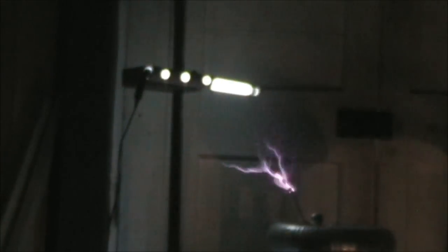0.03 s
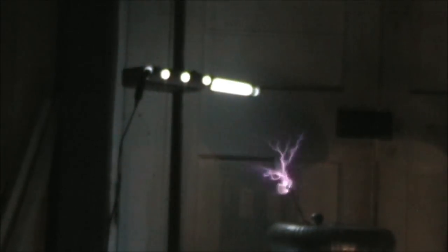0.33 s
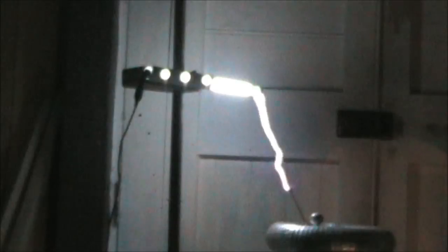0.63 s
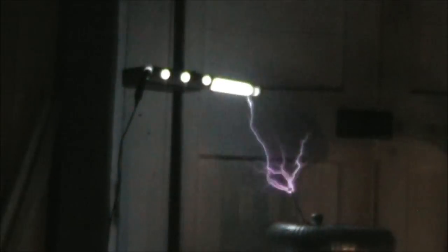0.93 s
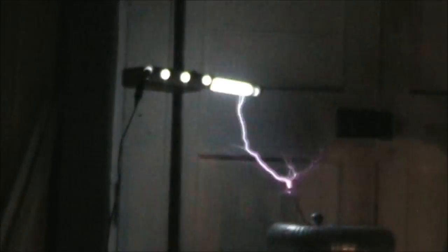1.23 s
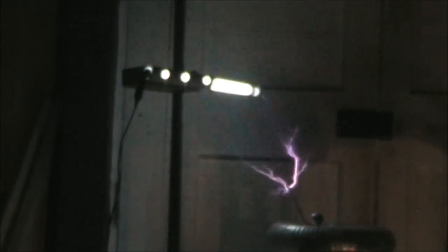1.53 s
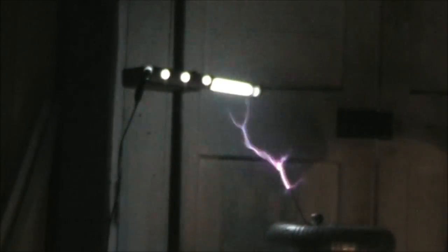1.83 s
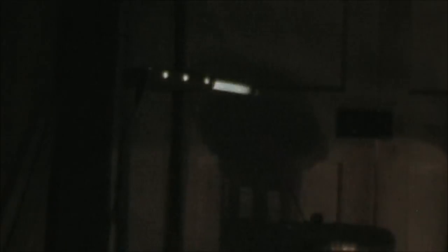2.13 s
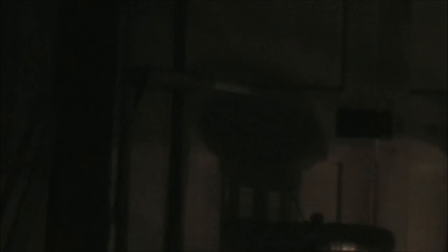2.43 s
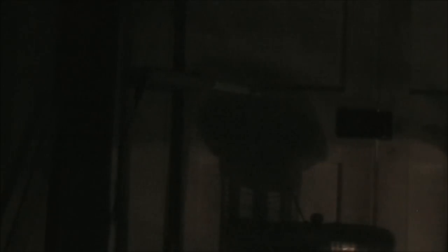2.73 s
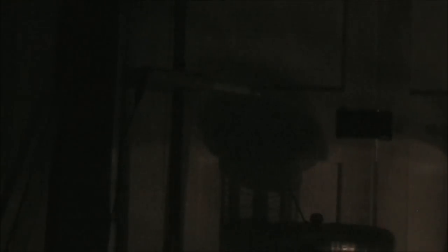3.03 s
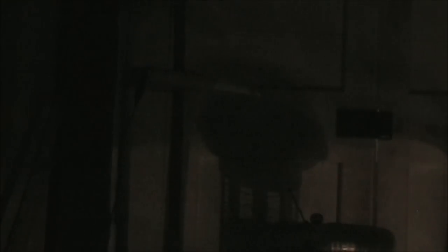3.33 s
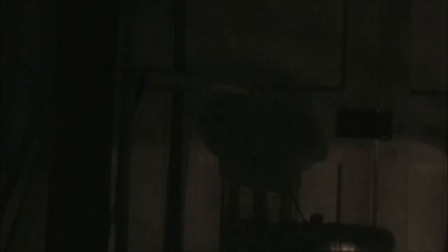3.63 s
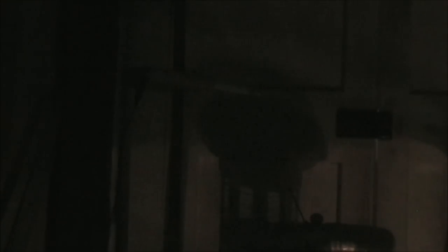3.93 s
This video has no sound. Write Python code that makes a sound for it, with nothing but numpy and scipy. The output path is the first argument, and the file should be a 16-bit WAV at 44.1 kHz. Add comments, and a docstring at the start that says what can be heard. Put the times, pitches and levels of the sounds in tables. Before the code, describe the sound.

A high-voltage coil throws loud, buzzing, crackling sparks in a small hard-walled room. Halfway through they cut off, leaving a much quieter motor whirring with a rapid metallic scrape. The stereo microphones are far enough away to catch the walls.

```python
"""A spark coil in a small hard room, on a stereo pair far enough off to hear plenty of the walls.
First its rotary gap throws buzzing arcs, which push the recorder's gain control down.
At about 2 s the power is cut; the arcs die with the room and the gain slowly comes back up.
The gap's motor whirs on, its rotor scraping once a turn, then from 3.2 s only now and then."""
import sys
import numpy as np
from scipy import signal
from scipy.fft import rfft, irfft, next_fast_len
from scipy.io import wavfile
from scipy.ndimage import uniform_filter1d

SR = 44100
rng = np.random.default_rng(int(sys.argv[2]) if len(sys.argv) > 2 else 0)


def master(y):
    """Save y as 16-bit WAV."""
    cut = np.clip(np.atleast_2d(y).T, -1, 1)
    pcm = np.round(cut * 32767)  # scale
    wavfile.write(sys.argv[1], SR, pcm.astype(np.int16))


N = 176400
TIME = np.arange(N) / SR

# stereo width of the room's reverberation (frequency [Hz], side gain [dB])
ROOM_WIDTH = [(200, 2), (600, -16), (1200, -11), (2300, -16.5), (4500, -9), (8000, -4), (13000, -5)]
ROOM_T60_S, ROOM_BUILD_S = 0.28, 0.0048

# spectrum of the air stirred by the rotor (frequency [Hz], relative level [dB])
WHIR_SPECTRUM = [(25, -8), (60, -17.5), (140, -19), (260, -10), (400, -14.5), (750, -18), (1000, -8.5),
                 (1900, -7.5), (2900, -14.5), (4200, -21), (9500, -19), (12000, -31), (14000, -51)]
# loudness of that whir (time [s], level [dB])
WHIR_ENVELOPE = [(2.5, -42), (3.35, -40.5), (3.55, -39.5), (3.76, -38), (3.92, -39.5), (4, -39)]
# its stereo width (frequency [Hz], side gain [dB])
WHIR_SIDE = [(150, 2), (400, -1.5), (900, -10), (2000, -17), (4500, -3), (8000, -1)]
# steady whines of the motor (frequency [Hz], level [dB])
MOTOR_WHINES = [(1712, -56.5), (2105, -52.5), (2751, -59), (3467, -52.5), (3903, -49.5), (7833, -51)]

# spectrum of the rotor's scrape (frequency [Hz], relative level [dB])
SCRAPE_SPECTRUM = [(350, -35), (700, -38.5), (900, -4.5), (1150, -6), (1450, -7.5), (1800, -9),
                   (2400, -6.5), (3300, -3), (5500, -3), (8000, -1), (9800, -2.5), (11000, -17),
                   (12500, -17.5), (14000, -62)]
# lone scrapes once the rotor runs freer (time [s], level against a regular scrape [dB])
LATE_SCRAPES = [(3.206, 1), (3.233, -3), (3.261, -3.5), (3.317, -2.5), (3.345, -1), (3.373, -2),
                (3.401, 0.5), (3.458, 1), (3.513, -2.5), (3.541, -2), (3.569, -6), (3.597, -.7), (3.653, 1),
                (3.682, -1.5), (3.736, -2.5), (3.765, -6), (3.792, 0.5), (3.847, 1.5), (3.989, -0.5)]
# resonances of rotor and frame (frequency [Hz], t60 [s], relative level [dB], delay after contact [s])
FRAME_MODES = [(1114, 0.24, -2, 0.0081), (1050, .02, -2, .009), (951, .014, -6, .012),
               (1720, .07, -6, .012), (2403, 0.026, -12, 0.00115), (2784, .04, -2, 0.0055),
               (7640, 0.0098, -23, 0.0015), (9400, .01, -16, 0.0031)]
TURN_HZ, LAST_REGULAR_S = 35.68, 3.1775
WOBBLE_HZ, WOBBLE_PEAK_S, WOBBLE_DB = 15.2, 3.009, 0.3
SCRAPE_DB, SCRAPE_SCATTER_DB, FRAME_DB, LONE_RING_DB = -33, 1.8, -36.5, -4

# low flutter of the arcs (time [s], relative level [dB])
FLUTTER_ENVELOPE = [(0.0, -44), (0.528, -42), (0.584, -31.5), (0.992, -47), (1.07, -33), (1.216, -44.5),
                    (1.238, -36), (1.26, -46), (1.314, -46), (1.358, -35.5), (1.544, -49), (1.588, -44.5),
                    (1.752, -43), (1.784, -48), (1.838, -40.5), (1.904, -40), (1.932, -30.5), (1.96, -48)]
# spectrum of that flutter (frequency [Hz], relative level [dB])
FLUTTER_SPECTRUM = [(25, -12), (100, -4.5), (300, 1), (500, -1), (900, -1.5), (2500, -19)]
# harmonics of the buzz, relative levels (time [s], first [dB], second [dB], third [dB], fourth [dB])
BUZZ_HARMONICS = [(0.0, -42, -36.5, -31, -48), (0.108, -35, -25, -30.5, -38),
                  (0.354, -30.5, -25, -23.5, -27), (0.446, -33, -33, -26.5, -38),
                  (0.512, -30, -28.5, -21, -27.5), (0.648, -32.5, -28.5, -38, -22),
                  (0.774, -32.5, -33, -30.5, -36), (1.01, -33.5, -28.5, -32.5, -31.5),
                  (1.146, -33.5, -29.5, -37, -26.5), (1.266, -33, -29, -26.5, -39),
                  (1.392, -30, -29, -29.5, -25), (1.456, -33, -30.5, -29, -37),
                  (1.882, -31.5, -24, -26.5, -29.5), (1.96, -34.5, -25.5, -31.5, -29)]
# weaker tones between the harmonics of the buzz (frequency [x spark rate], relative level [dB])
BUZZ_SIDE_TONES = [(1.31, -44), (1.5, -37.5), (2.175, -36), (2.305, -47), (2.495, -41.5), (3.5, -35),
                   (4.51, -36), (4.89, -38), (5.5, -36.5)]
# spark rate, sagging under load (time [s], rate [Hz])
SPARK_RATE = [(0, 577), (.5, 569.3), (.75, 567.7), (1.1, 568), (1.6, 571.5), (2, 572.8)]
# spectrum of a spark's crack (frequency [Hz], relative level [dB])
CRACK_SPECTRUM = [(100, -51), (300, -24.5), (550, -16), (800, -13), (1150, -12), (1500, -8.5), (2400, -7),
                  (4000, -5.5), (6000, -5.5), (8300, -2), (9800, -5.5), (11500, -16.5), (13000, -22),
                  (14500, -89)]
CUT_S, MAINS_RIPPLE_HZ, RIPPLE_DEPTH = 1.983, 100, 0.12
CRACK_DB, SURGE_DB_PER_DB = 1.5, 0.3

# mismatch of the two microphones (frequency [Hz], left minus right [dB])
MIC_BALANCE = [(500, 0.1), (4500, -0.2), (8000, 0.1), (12000, -3)]
LOW_CUT_HZ, TOP_CUT_HZ, PEAK_LIMIT = 35, 14500, 0.8


def undb(db):
    """Decibels to gain."""
    return 10 ** (np.asarray(db) / 20)


def unit(x):
    """Scale to rms 1."""
    return x / np.sqrt(np.mean(x ** 2))


def curve(rows, column=1):
    """One column of a table, joined by straight lines in time."""
    rows = np.array(rows)
    return np.interp(TIME, rows[:, 0], rows[:, column])


def colour(x, points):
    """Filter by (frequency [Hz], gain [dB]) points."""
    hz, db = np.array(points).T
    size = next_fast_len(x.shape[-1] + 4096)
    bins_hz = np.maximum(np.fft.rfftfreq(size, 1 / SR), 1)
    gain = undb(np.interp(np.log(bins_hz), np.log(hz), db))
    return irfft(rfft(x, size) * gain, size)[..., :x.shape[-1]]


def whiten(x):
    """Flatten the spectrum of a burst and keep its timing."""
    return irfft(np.exp(1j * np.angle(rfft(x))), len(x)) * np.sqrt(np.sum(x ** 2))


def drift(rate_hz):
    """Smooth random wandering with rms 1."""
    hold = int(SR / rate_hz)
    steps = np.repeat(rng.standard_normal(200)[:N // hold + 2], hold)
    return unit(uniform_filter1d(steps, hold)[:N])


def clicks(times, sizes):
    """Impulses at the given moments."""
    at = np.round(np.asarray(times) * SR).astype(int)
    inside = (at >= 0) & (at < N)
    return np.bincount(at[inside], np.asarray(sizes)[inside], N)


def ring(x, response):
    """Play a sound through an impulse response."""
    return signal.fftconvolve(x, response)[:N]


def stereo(mid, side):
    """Left and right from mid and side."""
    return np.array([mid + side, mid - side])


def room(x, wet_db):
    """Direct sound plus the short, bright reverberation of hard walls; more wet_db sounds farther off."""
    t = np.arange(SR // 2) / SR
    fade = undb(-60 * t / ROOM_T60_S) * (1 - np.exp(-t / ROOM_BUILD_S))
    mid, side = rng.standard_normal((2, len(t))) * fade / np.sqrt(np.sum(fade ** 2)) * undb(wet_db)
    return stereo(x + ring(x, mid), colour(ring(x, side), ROOM_WIDTH)) / np.hypot(1, undb(wet_db))


def motor(whir_waver_db=0.7, whine_waver_db=2):
    """The bed of the scene: air stirred by the rotor, with thin wavering whines."""
    mid, side = unit(colour(rng.standard_normal((2, N)), WHIR_SPECTRUM))
    air = stereo(mid, colour(side, WHIR_SIDE)) * undb(curve(WHIR_ENVELOPE) + whir_waver_db * drift(15))
    whines = 0
    for hz, db in MOTOR_WHINES:
        amplitude = np.sqrt(2) * undb(db + whine_waver_db * drift(5.75))
        whines += amplitude * np.sin(2 * np.pi * hz * TIME + 0.2 * drift(6.6))
    return air + whines


def scrape(touches, hold_s=0.0055, fall_s=0.0039, fresh_gain=0.35):
    """The same rough spot gives the same burst of grit at each touch, plus a little fresh noise."""
    t = np.arange(SR // 5) / SR
    contact = np.exp(-np.maximum(t - hold_s, 0) / fall_s)
    repeated = ring(touches, whiten(contact * rng.standard_normal(len(t))))
    fresh = fresh_gain * ring(touches, contact) * rng.standard_normal(N)
    return colour(repeated + fresh, SCRAPE_SPECTRUM)


def frame(touches, build_s=0.0021):
    """Each touch rings the rotor and its frame, treble first and the low modes last."""
    t = np.arange(SR // 5) / SR
    modes = 0
    for hz, t60, db, delay in FRAME_MODES:
        age = np.maximum(t - delay, 0)
        envelope = (1 - np.exp(-age / build_s)) * undb(-60 * age / t60)
        modes += undb(db) * unit(ring(touches, envelope * np.sin(2 * np.pi * hz * age)))
    return modes


def rotor():
    """The wobbling rotor scrapes and rings its frame on every turn, later only on some."""
    turns = LAST_REGULAR_S - np.arange(int(LAST_REGULAR_S * TURN_HZ)) / TURN_HZ
    wobble_db = WOBBLE_DB * np.cos(2 * np.pi * WOBBLE_HZ * (turns - WOBBLE_PEAK_S))
    regular = clicks(turns, undb(wobble_db + SCRAPE_SCATTER_DB * rng.standard_normal(len(turns))))
    lone_times, lone_db = np.array(LATE_SCRAPES).T
    lone = clicks(lone_times, undb(lone_db))
    grit = room(scrape(regular + lone), wet_db=0.5)
    ringing = room(frame(regular + undb(LONE_RING_DB) * lone), wet_db=-7)
    return undb(SCRAPE_DB) * unit(grit) + undb(FRAME_DB) * unit(ringing)


def powered():
    """Full while the coil is on, then dying with the room."""
    return undb(-60 * np.maximum(TIME - CUT_S, 0) / ROOM_T60_S)


def flutter(gain_db=15.5, side_db=7.5):
    """Low, uneven noise under the arcs, different at each microphone."""
    mid, side = unit(colour(rng.standard_normal((2, N)), FLUTTER_SPECTRUM))
    return stereo(mid, side * undb(side_db)) * undb(curve(FLUTTER_ENVELOPE) + gain_db) * powered()


def buzz(passes, ripple, harmonic_db=14.5, side_tone_db=13.5):
    """The pitched part of the arcs: tones on the spark rate that waver as the streamers wander."""
    def tone(multiple):
        cycles = multiple * passes + rng.random()
        return np.sqrt(2) * np.sin(2 * np.pi * cycles + 0.12 * multiple * drift(29.95))

    harmonics = sum(undb(curve(BUZZ_HARMONICS, column=k) + harmonic_db) * tone(k) for k in range(1, 5))
    side_tones = sum(undb(db + side_tone_db + 2 * drift(9.03)) * tone(k) for k, db in BUZZ_SIDE_TONES)
    return (harmonics + side_tones) * ripple * powered()


def sparks(passes, ripple, branches=4, jitter_s=0.00017, scatter_db=2, waver_db=0.82):
    """One sharp, uneven crack per electrode pass; each branch of the arc meets the room differently."""
    count = int(np.interp(CUT_S, TIME, passes))
    pass_times = np.interp(np.arange(count), passes, TIME)
    lateness, strength = rng.standard_normal((N // 100, 2))[:count].T
    branch = rng.integers(branches, size=N // 100)[:count]
    times = pass_times + jitter_s * lateness
    sizes = undb(scatter_db * strength) * np.interp(pass_times, TIME, ripple)
    cracks = sum(room(clicks(times, sizes * (branch == k)), wet_db=4) for k in range(branches))
    cracks = colour(cracks, CRACK_SPECTRUM)
    coil_on = TIME < CUT_S
    # the crackle surges with the flutter as the arcs strike a lamp
    flutter_db = curve(FLUTTER_ENVELOPE)
    surge_db = SURGE_DB_PER_DB * (flutter_db - np.mean(flutter_db[coil_on])) * powered()
    return cracks / np.std(cracks[:, coil_on]) * undb(CRACK_DB + surge_db + waver_db * drift(24.3))


def scene():
    """What reaches the microphones: arcs pulsing with the mains until the cut, over the running motor."""
    passes = np.cumsum(curve(SPARK_RATE)) / SR  # running count of electrode passes
    ripple = 1 + RIPPLE_DEPTH * np.sin(2 * np.pi * MAINS_RIPPLE_HZ * TIME)
    arcs = sparks(passes, ripple) + buzz(passes, ripple) + flutter()
    return arcs + rotor() + motor()


def gain_control(x, ceiling_db=-13, recover_db_per_s=20.5, window_s=0.081):
    """The recorder ducks as soon as the average power passes its ceiling, and recovers slowly."""
    power = uniform_filter1d(np.mean(x ** 2, axis=0), int(window_s * SR))
    excess_db = np.maximum(10 * np.log10(np.abs(power) + 1e-12) - ceiling_db, 0)
    recovery_db = recover_db_per_s * TIME
    duck_db = np.maximum.accumulate(excess_db + recovery_db) - recovery_db
    return x * undb(-duck_db)


def record(dry):
    """A slightly unequal microphone pair, then low cut, gain control, rounded peaks and steep top cut."""
    left = colour(dry[0], [(hz, db / 2) for hz, db in MIC_BALANCE])
    right = colour(dry[1], [(hz, -db / 2) for hz, db in MIC_BALANCE])
    low_cut = signal.butter(2, LOW_CUT_HZ, "high", fs=SR, output="sos")
    top_cut = signal.ellip(8, .2, 80, TOP_CUT_HZ, fs=SR, output="sos")
    ducked = gain_control(signal.sosfilt(low_cut, [left, right]))
    rounded = PEAK_LIMIT * np.tanh(ducked / PEAK_LIMIT)
    return signal.sosfilt(top_cut, rounded)


dry = scene()
out = record(dry)
master(out)
```